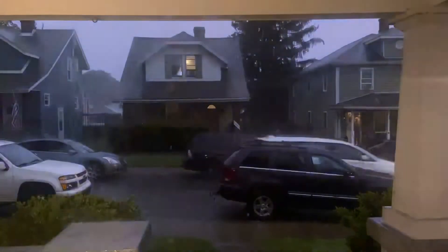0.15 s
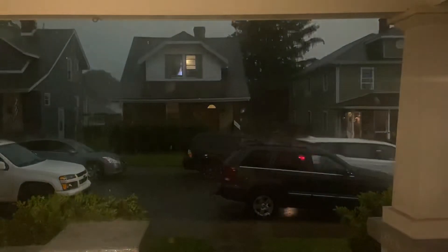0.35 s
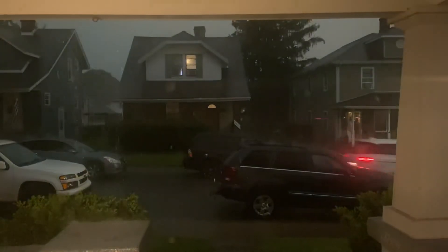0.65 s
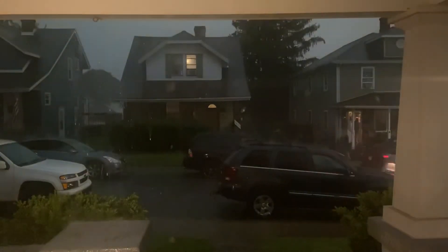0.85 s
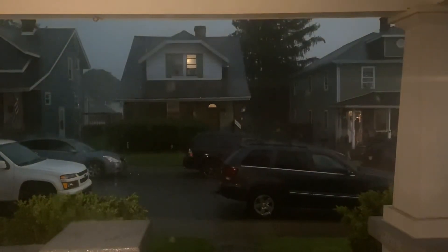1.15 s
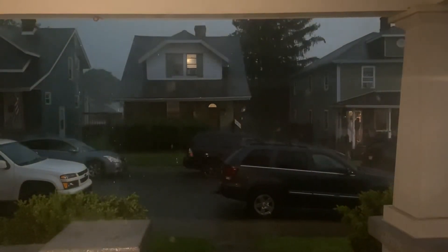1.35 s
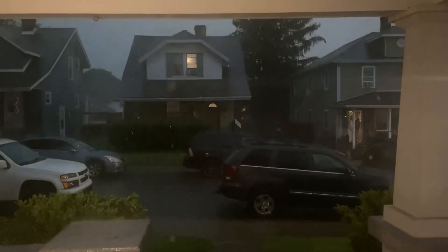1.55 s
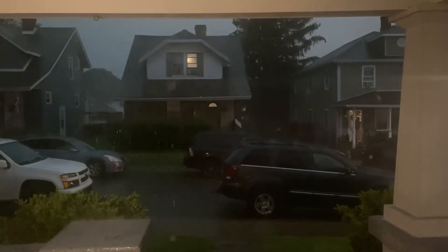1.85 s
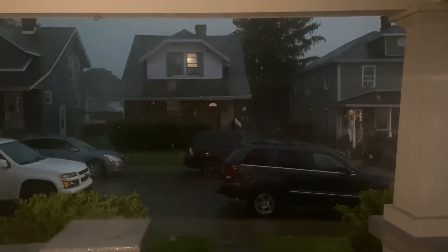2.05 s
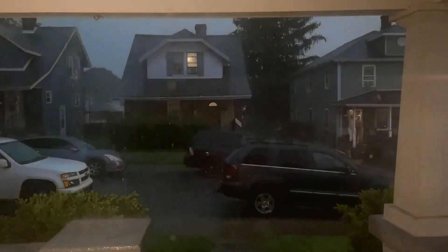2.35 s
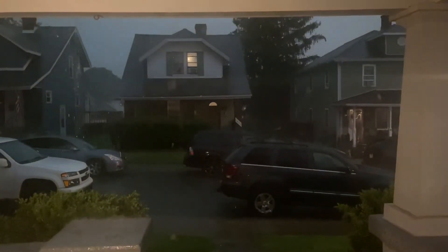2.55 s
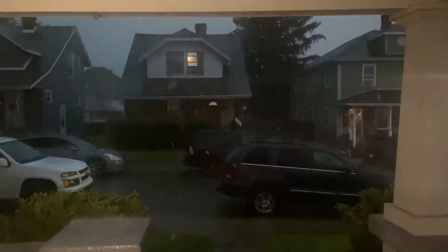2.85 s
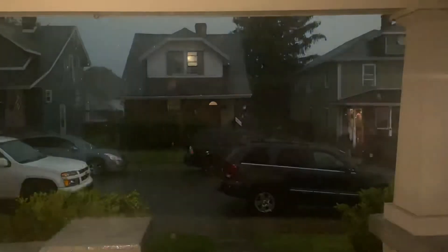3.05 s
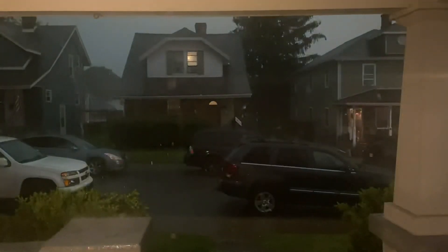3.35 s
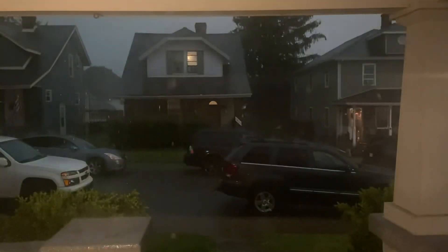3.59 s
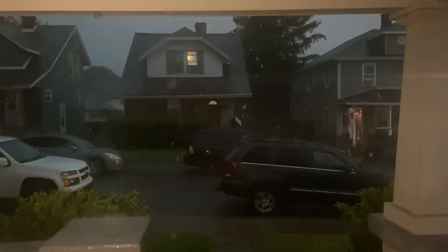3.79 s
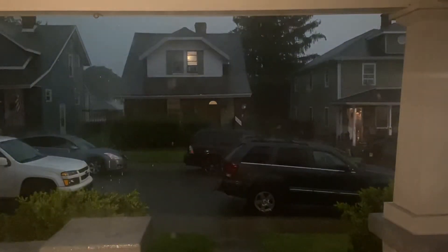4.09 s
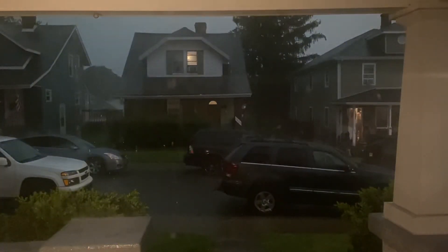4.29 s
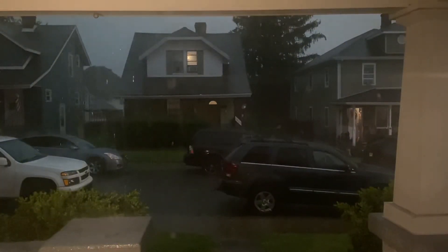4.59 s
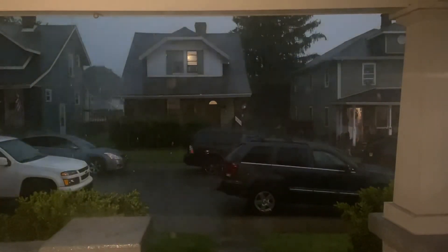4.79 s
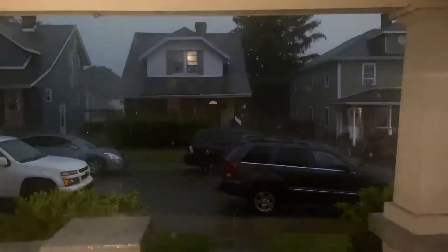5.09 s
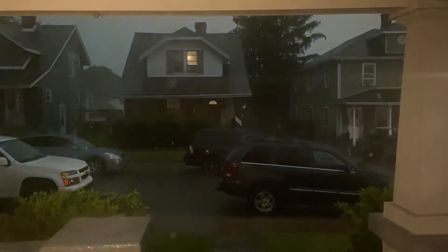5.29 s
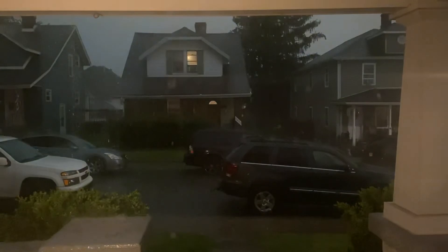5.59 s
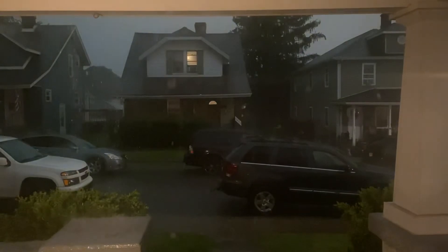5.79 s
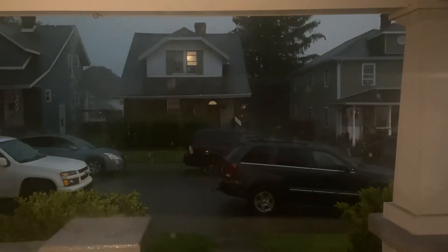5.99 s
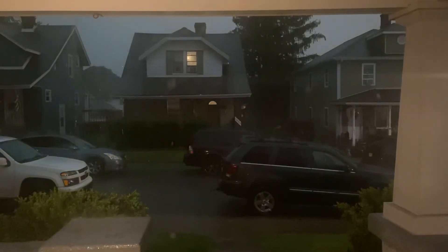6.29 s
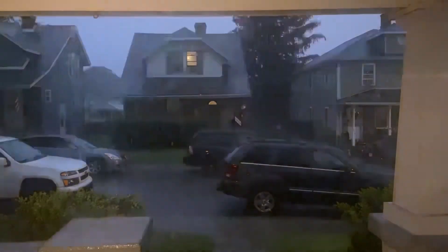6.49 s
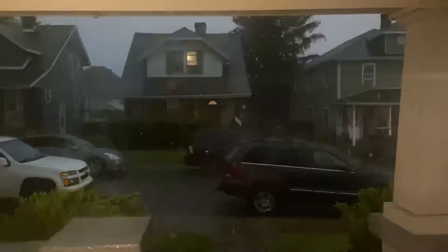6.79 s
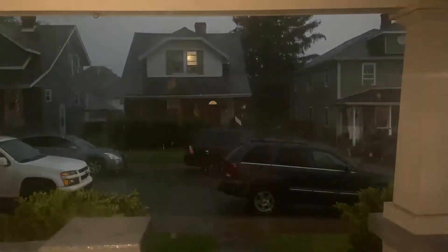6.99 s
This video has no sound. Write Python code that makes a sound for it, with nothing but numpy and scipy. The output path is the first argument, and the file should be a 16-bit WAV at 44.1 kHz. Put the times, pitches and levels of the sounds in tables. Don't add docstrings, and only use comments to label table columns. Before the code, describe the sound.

Heavy rain drums and hisses on a residential street while a long low peal of distant thunder swells, rumbles on and dies away.

```python
import sys
import numpy as np
from scipy import signal
from scipy.fft import rfft, irfft, next_fast_len
from scipy.io import wavfile
from scipy.ndimage import uniform_filter1d

SR = 44100
rng = np.random.default_rng(int(sys.argv[2]) if len(sys.argv) > 2 else 0)


def master_out(mix):
    frames = np.transpose(np.atleast_2d(mix))
    ceiling = np.clip(frames, -1, 1)
    pcm = np.round(ceiling * 32767).astype(np.int16)
    wavfile.write(sys.argv[1], SR, pcm)


def gain_from_db(level_db):
    decades = np.asarray(level_db, float) / 20
    return 10 ** decades


N = 314918
TIME = np.arange(N) / SR
SIZE = next_fast_len(N + SR)
HZ = np.maximum(np.arange(SIZE // 2 + 1) * SR / SIZE, 1)

# (t/s, level/dB)
ROLL_STRENGTH = [(0, 3.5), (.3, 1), (0.579, 2), (.68, 5.5), (1.05, 8), (1.4, 3.5), (1.52, -3), (1.65, 4.5),
                 (1.95, 2), (2.2, -3), (2.6, -0.5), (2.85, 3.5), (3.25, 0.5), (3.5, 5), (3.95, -3.5),
                 (5.8, -2), (6.35, -4), (7.14, -7.5)]
# (f/Hz, level/dB)
ROLL_SPECTRUM = [(20, -26.5), (33, -8), (48, 5), (91, 5.5), (119, 2), (144, -0.5), (243, -13.5), (276, -16),
                 (384, -28.5), (550, -53.5), (920, -120)]
# (upper edge f/Hz, level/dB, share of the strength [1])
ROLL_BANDS = [(40, -59, 0.33), (69.5, -50.5, 0.33), (113, -50, 0.34), (143, -51, 1.0), (178, -49, 0.6),
              (232, -50.5, 0.44), (296, -54, 0.1), (397, -59.5, 0.3)]


def thunder():
    pulses = crowd(4000, scatter_db=2.0)
    spectrum = ports(pulses, gain_from_db(shape(ROLL_SPECTRUM)))
    return played(spectrum, ROLL_STRENGTH, ROLL_BANDS, flicker_db=1.96, rate=15, even=0.78)


# (t/s, peak level/dB, f/Hz)
CLAPS = [(0.07, -22.5, 102.6), (0.173, -27.5, 143), (0.297, -26.5, 146), (0.355, -25.5, 127.6),
         (0.403, -28.5, 101.7), (0.622, -24.5, 110.3), (0.79, -19.5, 130), (0.907, -20.5, 131.7),
         (1.014, -21, 132), (1.084, -21, 124.3), (1.26, -27, 160), (1.303, -24.5, 99.4),
         (1.354, -22, 108.3), (1.493, -28.5, 92), (1.631, -22, 120.6), (1.707, -20, 117.8),
         (1.78, -24, 130.2), (1.853, -31, 104.3), (1.957, -23.5, 133.8), (2.046, -27.5, 94.2),
         (2.295, -28, 100.7), (2.445, -30, 113), (2.528, -28, 123), (2.631, -29.5, 101), (2.744, -26, 118),
         (2.879, -26, 106.4), (3.091, -27, 104.6), (3.306, -27.5, 126), (3.549, -23.5, 108.7),
         (3.636, -28, 99.3), (3.702, -30, 101.6), (3.892, -32.5, 85.6), (4.104, -27, 115.7),
         (4.206, -29, 107), (4.347, -31.5, 111), (4.42, -31, 87.6), (4.5, -30.5, 145),
         (4.548, -26.5, 103.4), (4.739, -25.5, 98.2), (4.839, -30, 103.4), (5.116, -28.5, 105.3),
         (5.238, -27.5, 123.5), (5.318, -27, 103.7), (5.627, -28.5, 107.6), (5.715, -31, 129.6),
         (5.769, -29, 109), (6.024, -32.5, 108), (6.199, -30, 123), (6.416, -29, 131), (6.475, -30.5, 125),
         (6.641, -29, 99), (6.718, -29, 115.7), (6.789, -29, 100.6), (6.835, -36, 108),
         (7.007, -28.5, 92.3),
         (0.639, -27, 98.7), (0.664, -23.5, 119), (0.709, -24.5, 110.2), (0.735, -21, 131.7),
          (0.759, -26, 143), (0.824, -23.5, 98.5), (0.849, -25.5, 124), (0.939, -23, 106),
          (0.979, -24, 131.7), (1.134, -22, 125.2), (1.154, -21, 140.8), (1.194, -25, 135.5),
          (1.224, -30.5, 174.5), (1.389, -22.5, 146.6), (3.419, -28, 94.2), (3.479, -28, 133.3),
          (3.989, -34.5, 83), (6.269, -28, 88), (6.309, -28.5, 153), (6.339, -30.5, 110),
          (6.369, -29.5, 100), (6.948, -29.5, 110.2), (7.079, -31, 89.2)]
# (t/s, peak level/dB, f/Hz)
THUDS = [(0.18, -29.5, 184), (0.303, -33.5, 216), (0.494, -36, 205), (0.755, -33, 172), (1.005, -29.5, 218),
         (1.053, -33, 177), (1.836, -35.5, 187), (1.99, -34, 173), (2.127, -35, 172), (2.526, -34, 172),
         (2.66, -35, 215), (2.795, -35.5, 197), (2.985, -34, 209), (3.323, -33, 269), (3.363, -33.5, 228),
         (3.432, -34, 188), (3.548, -31.5, 188), (4.428, -37, 193), (5.068, -37, 196), (5.254, -34, 173),
         (5.563, -39, 195), (5.737, -37, 186), (5.861, -34.5, 191), (6.229, -38.5, 180), (6.465, -35, 202)]
# (t/s, peak level/dB, f/Hz)
BOOMS = [(0.021, -33, 51), (0.192, -34.5, 48), (0.822, -38, 32.3), (0.825, -30, 69.5), (0.987, -32, 72.7),
         (1.481, -37, 73), (2.214, -39, 61.9), (2.548, -40, 51.1), (2.76, -30, 61.9), (3.369, -38, 72.7),
         (3.845, -38, 43.1), (4.273, -39, 72.7), (4.403, -41.5, 72.7), (4.906, -37, 67.3),
         (5.25, -42, 72.7), (5.882, -38, 72.7), (6.074, -41, 72.7), (6.217, -36, 64.4), (6.436, -35, 53.8),
         (6.623, -52, 32.3), (6.623, -38, 64.6), (6.749, -38, 53.4)]


def claps():
    clap_t60_s, thud_t60_s, boom_t60_s = 0.17, 0.12, 0.38
    clap_rise_s, boom_rise_s = 0.0096, 0.025
    clap_trim_db, thud_trim_db = 2.5, -3
    rows = [(s, db + clap_trim_db, hz, clap_t60_s, clap_rise_s) for s, db, hz in CLAPS]
    rows += [(s, db + thud_trim_db, hz, thud_t60_s, clap_rise_s) for s, db, hz in THUDS]
    rows += [(s, db, hz, boom_t60_s, boom_rise_s) for s, db, hz in BOOMS]
    return rings(rows)


# (t/s, peak level/dB, f/Hz)
DRIPS = [(0.284, -37, 2700), (.307, -40, 2800), (0.554, -39, 2600), (0.5913, -34.5, 3040),
         (1.216, -37, 3100), (1.245, -35.5, 2070), (1.391, -40.5, 2220), (1.912, -37, 2070),
         (2.2723, -43.5, 2940), (3.509, -40, 3010), (2.546, -45.5, 2170), (3.235, -41, 2070),
         (3.3941, -45, 2070), (3.49, -33.5, 2120), (4.0374, -42, 2950), (4.51, -43, 2590),
         (5.105, -43, 3220), (5.516, -40, 3130), (5.65, -41.5, 3170), (6.0888, -47, 3050),
         (6.188, -42, 3600), (6.285, -40.5, 3640), (7.06, -43.5, 2870), (6.6743, -42.5, 2700),
         (6.8684, -40, 3350), (6.9233, -40, 3030)]
# (t/s, peak level/dB, f/Hz)
SLAPS = [(0.5195, -29, 2780), (0.49, -38, 2380), (.884, -31.5, 2600), (0.885, -35, 3400),
         (2.443, -38.5, 2670), (.5205, -37.5, 5200), (.5205, -38, 8200), (.597, -35.5, 4200),
         (.891, -33.5, 2800), (.897, -36, 3400), (2.896, -38, 2730), (1.394, -37.5, 2700),
         (6.728, -40, 2870), (7.13, -37.5, 3500), (2.0, -39, 2150)]
# (t/s, peak level/dB, f/Hz)
PLINKS = [(3.478, -36, 2990), (3.5, -39, 2900), (3.525, -46, 2690), (1.85, -42, 2860), (2.12, -45, 2900),
          (2.37, -47, 2800), (2.69, -40, 2900), (6.78, -42.5, 2910), (6.97, -44, 2800),
          (3.636, -40.5, 2720), (3.703, -42.5, 2850), (5.095, -45, 2780), (5.109, -40.5, 2930),
          (5.134, -41, 3120), (5.233, -41.5, 2700), (5.25, -44, 2920), (5.285, -44, 2850),
          (.552, -46, 2750), (.58, -41, 2850), (.64, -46, 2800), (.78, -41.5, 2800), (2.65, -41, 2900),
          (2.27, -44, 3200), (6.43, -43, 2700), (6.52, -45, 2900), (6.94, -43, 2100), (7.05, -45, 2800),
          (4.78, -44, 2750), (4.93, -46, 2900)]
# (t/s, peak level/dB)
TICKS = [
    (0.5198, -37.5),
    (.597, -37.5),
    (2.745, -39),
]
# (t/s, peak level/dB, t60/s)
GLINTS = [
    (0.5198, -22, .04),
    (.597, -37, .05),
    (1.14, -42.5, .3),
    (1.19, -41.5, .3),
    (1.235, -45, .2),
    (2.745, -26, 0.045),
]


def drips():
    drip_rise_s, tick_rise_s = 0.004, 0.001
    # t60/s, rise/s, half width/octaves
    rows = [(*row, 0.18, drip_rise_s, 0.37) for row in DRIPS]
    rows += [(*row, 0.036, 0.00079, 0.35) for row in SLAPS]
    rows += [(*row, 0.087, drip_rise_s, 0.14) for row in PLINKS]
    rows += [(s, db, 10500, 0.086, tick_rise_s, 0.97) for s, db in TICKS]
    rows += [(s, db, 14500, t60, tick_rise_s, 0.09) for s, db, t60 in GLINTS]
    return splashed(rows)


# (t/s, peak level/dB, t60/s)
SPRAY = [(.86, -44, .6), (6.42, -48, .3), (6.6, -48, .3), (1.201, -37, 0.48), (2.271, -44.5, 0.38),
         (2.641, -49.5, .5), (3.47, -39, .36), (6.7, -45, .6), (1.75, -47, .6), (4.501, -45, .18),
         (5.1, -50.5, 0.33), (5.521, -43, 0.056), (5.646, -40.5, 0.44)]
# (t/s, peak level/dB, t60/s)
MIST = [
    (.87, -39.5, 0.36),
    (1.129, -40, 0.73),
    (1.921, -46, 0.24),
    (2.201, -48, 0.84),
    (4.77, -50.5, .5),
    (5.311, -42.5, 0.22),
]


def spray():
    rows = [(s, db, 4700, t60, 0.017, 0.42) for s, db, t60 in SPRAY]
    rows += [(s, db, 11000, t60, 0.086 * t60, 0.22) for s, db, t60 in MIST]
    return splashed(rows)


# (t/s, peak level/dB, f/Hz, t60/s, half width/octaves)
SPILLS = [(.594, -32, 1310, 0.14, 0.87), (1.213, -34.5, 930, 0.15, 0.15), (1.236, -35, 520, 0.11, 0.37),
          (1.279, -35, 850, 0.09, .32), (1.912, -39, 1610, 0.15, 0.56), (3.245, -38, 1250, 0.26, 0.95),
          (3.484, -31.5, 1000, 0.25, .45), (3.505, -31.5, 800, 0.52, 0.98), (3.538, -37, 588, .35, 0.7),
          (3.662, -43, 700, 0.18, 0.6), (5.12, -38.5, 1430, 0.15, .44), (6.29, -38, 480, 0.58, 0.66),
          (6.338, -35.5, 1050, 0.19, 0.6), (6.345, -34, 1900, .12, 0.54), (6.51, -38.5, 800, 0.29, .7)]
# (f/Hz, width/Hz, level/dB)
BOARD_MODES = [(431, 96, 2.5), (680, 37, 1), (772, 10, 1.5), (980, 60, -4), (1051, 37, -5),
               (1236, 68, -7.5), (1510, 13, -22)]


def spills():
    rows = [(s, db, hz, t60, 0.04 * t60, octaves) for s, db, hz, t60, octaves in SPILLS]
    boards = 0
    for k, (hz, width, db) in enumerate(BOARD_MODES):
        boards = boards + (-1) ** k * gain_from_db(db) * resonance(hz, width)
    slosh = gain_from_db(-14.0) * resonance(550, 2300)
    return irfft(ports(bursts(rows), gain_from_db(7.5) * (boards + slosh)), SIZE)[:, :N]


# (t/s, peak level/dB, f/Hz, t60/s)
KNOCKS = [(1.213, -41, 925, 0.11), (1.23, -40, 960, 0.13), (1.247, -47, 947, 0.072), (1.234, -47, 775, .1),
          (1.241, -45.5, 2090, 0.098), (1.1, -48, 960, 0.073), (3.486, -48, 2090, 0.11),
          (3.487, -40.5, 1077, 0.16), (3.509, -44, 1096, .2), (3.55, -48, 1155, .12),
          (3.49, -47, 1290, 0.17), (3.505, -40.5, 681, .2), (3.52, -40, 695, .18), (3.548, -38.5, 685, .2),
          (3.585, -42, 705, 0.12), (3.495, -45, 472, .12), (3.524, -36.5, 431, 0.22),
          (3.553, -38.5, 424, 0.3), (3.663, -46, 437, .15), (6.34, -50, 1088, 0.11),
          (6.355, -50.5, 877, 0.11), (6.345, -47, 478, 0.18), (6.36, -50.5, 612, 0.13),
          (6.515, -52, 1310, 0.1), (6.515, -51, 540, .1), (6.94, -49, 533, 0.1),
          (.5205, -39.5, 2780, 0.046), (.526, -44, 2300, 0.06), (.521, -46.5, 3270, 0.065),
          (0.65, -47, 2690, .05), (.603, -48, 2205, .06), (3.486, -42.5, 900, .07), (3.492, -45, 750, .12),
          (3.505, -47, 1260, .15), (3.518, -44, 1160, .1), (3.548, -47, 1050, 0.11), (3.57, -48, 1200, .1),
          (3.515, -49.5, 2110, .12), (2.9, -44.5, 440, .12), (3.69, -46, 610, .1), (3.63, -48.5, 660, .1),
          (.598, -51.5, 3900, .04), (.614, -46, 940, .05), (.603, -48, 950, .05), (.531, -50, 3500, .05),
          (1.32, -50, 960, .1), (3.53, -38, 325, .25), (6.28, -42.5, 335, 0.37), (.885, -47, 2700, .05)]


def knocks():
    return rings([(*row, 0.041 * row[-1]) for row in KNOCKS])


# (t/s, level/dB)
PIPE_STRENGTH = [
    (0, -14),
    (6.2, -10.5),
    (6.55, 1.5),
    (7.14, -1),
]


def downpipe():
    water = rng.standard_normal((2, N))
    spectrum = ports(water, resonance(532.5, 11) ** 2)
    return played(spectrum, PIPE_STRENGTH, [(SR, -65, 1)], flicker_db=1.0, rate=12, even=.9)


# (t/s, level/dB)
RAIN_STRENGTH = [(0, -1), (.5, -0.5), (1.5, -1), (2.8, -0.5), (3.6, -0.5), (3.95, -2), (5.9, -3),
                 (6.401, -3), (6.62, -2.5), (6.76, -4), (6.9, -2.5), (7.14, -3)]
# (f/Hz, level/dB)
RAIN_SPECTRUM = [(200, -7.5), (380, 8.5), (860, -6), (1300, -10), (1560, -14.5), (1950, -16), (2780, -16),
                 (3900, -19.5), (5600, -27), (6850, -26.5), (8000, -35.5), (10000, -44), (12200, -48),
                 (13500, -64), (16000, -64.5)]
# (upper edge f/Hz, level/dB, share of the strength [1])
RAIN_BANDS = [
    (627, -55.5, 1.1),
    (1000, -62.5, 1.5),
    (1600, -62, 1.3),
    (2310, -65, 4.1),
    (3840, -61, 0.89),
    (12400, -66.5, 0.59),
]


def rain():
    drops = rng.standard_normal((2, N)) + gain_from_db(-7.0) * crowd(1500, scatter_db=2.0)
    spectrum = ports(drops, gain_from_db(shape(RAIN_SPECTRUM)))
    return gain_from_db(-1.86) * played(spectrum, RAIN_STRENGTH, RAIN_BANDS, flicker_db=1.4, rate=24, even=.4)


def splashed(rows):
    street = gain_from_db(shape(RAIN_SPECTRUM) + 15.0) * HZ / (HZ + 2500)
    return irfft(ports(bursts(rows), street), SIZE)[:, :N]


def bursts(rows):
    out, droplets = np.zeros((2, N)), crowd(15000, scatter_db=1.3)
    for s, db, hz, t60, rise, octaves in rows:
        start, envelope = swell(s, db, t60, rise)
        part = slice(start, start + len(envelope))
        edges = hz * 2 ** (np.clip(octaves, .05, .8) * np.array([-1, 1]))
        band = signal.butter(2, edges, "band", fs=SR, output="sos")
        burst = signal.sosfilt(band, droplets[:, part] * envelope)
        out[:, part] += burst * np.sqrt(hz / np.ptp(edges))
    return out


def rings(rows):
    out, phases = np.zeros((2, N)), 2 * np.pi * rng.random(len(rows))
    for (s, db, hz, t60, rise), phase in zip(rows, phases):
        start, envelope = swell(s, db, t60, rise)
        tone = np.sin(2 * np.pi * hz * TIME[:len(envelope)] + phase)
        out[0, start:start + len(envelope)] += envelope * tone
    return irfft(ports(out, 1 / porch()), SIZE)[:, :N]


def swell(s, db, t60, rise):
    t = np.arange(int(SR * np.clip(t60, .02, .5))) / SR
    start = int(s * SR)
    decay = gain_from_db(db - 60 * t / max(t60, .01))
    envelope = decay * (1 - np.exp(-(t / max(rise, .0003)) ** 2))
    return start, envelope[:N - start]


def crowd(rate, scatter_db):
    hit = rng.random((2, N)) < rate / SR
    size = rng.exponential(size=(2, N))
    sign = rng.standard_normal((2, N))
    clicks = hit * gain_from_db(scatter_db * np.minimum(size, 2.5)) * sign
    return clicks / np.sqrt(np.mean(clicks ** 2))


def walk(rate):
    k = int(SR / rate)
    steps = np.repeat(rng.standard_normal(N // k + 1), k)
    return 1.3 * uniform_filter1d(uniform_filter1d(steps, k), k)[:N]


def played(spectrum, strength, bands, flicker_db, rate, even=0.):
    out, below = 0, 0
    swing_db = np.interp(TIME, *np.transpose(strength))
    for edge_hz, band_db, share in bands:
        under = 1 / (1 + (HZ / edge_hz) ** 8)
        band = irfft(spectrum * np.sqrt(np.maximum(under - below, 0)), SIZE)[:, :N]
        power = uniform_filter1d(uniform_filter1d(band.mean(axis=0) ** 2, size=6000), size=6000)
        band = band / power ** (even / 2)
        db = band_db + share * swing_db + flicker_db * walk(rate)
        out = out + band * gain_from_db(db) / np.std(band.mean(axis=0))
        below = under
    return out


def shape(table):
    hz, db = np.transpose(table)
    return np.interp(np.log(HZ), np.log(hz), db)


def resonance(hz, width):
    return 1j * HZ * width / (hz ** 2 - HZ ** 2 + 1j * HZ * width)


# (f/Hz, width/Hz, lift level/dB)
PORCH_MODES = [(103, 12, 4.5), (137.2, 4.7, 3.5), (161, 11, -1), (273.5, 14, 6), (426, 2.6, 4),
               (682, 13, -5.5), (1297, 110, 6.5), (2120, 130, 6), (2820, 600, 6.5), (11864, 25, 9),
               (12134, 20, 9.5)]


def porch():
    return gain_from_db(sum(db * abs(resonance(hz, width)) ** 2 for hz, width, db in PORCH_MODES))


# (f/Hz, level/dB)
APART = [(80, -16.5), (150, -17.5), (260, -8), (370, -6.5), (1000, -2.5), (1550, -2.5), (2050, -3),
         (2330, -10), (2900, -6), (3600, -6), (4500, -9.5), (6100, -6), (8800, 2.5), (10500, 1)]
# (f/Hz, level/dB)
LEFT_LEAN = [(60, -.4), (100, 0), (180, 1), (300, 2), (510, .3), (880, 1), (1500, 5), (2570, 5), (4390, 5),
             (7510, 1)]
# (f/Hz, phase/rad)
LEFT_LEAD = [(200, 0), (690, -.4), (1250, -.3), (1550, 2.0), (2070, .6), (2330, .2), (3270, .8), (3790, 0),
             (4480, .7), (5770, -.4), (6200, 0)]


def ports(pair, gain):
    mid, other = rfft(pair, SIZE) * gain
    mid = mid * porch()
    lean = gain_from_db(shape(LEFT_LEAN)) * np.exp(1j * shape(LEFT_LEAD))
    side = mid * (lean - 1) / (lean + 1) + other * gain_from_db(shape(APART))
    return np.array([mid + side, mid - side])


def scene():
    return thunder() + claps() + drips() + spray() + spills() + knocks() + downpipe() + rain()


def band_limit(x):
    return signal.sosfilt(signal.butter(12, 16000, fs=SR, output="sos"), x)


# (from f/Hz, to f/Hz, level/dB)
MID_GAPS = [(8200, 8850, -5.5), (8800, 9650, -19), (12250, 13600, -17)]
# (from f/Hz, to f/Hz, level/dB)
SIDE_GAPS = [(6250, 7550, -19), (10300, 12000, -19), (14800, 23000, -19)]


def record(dry):
    soft = .16 * np.tanh(dry / .16)
    mid, side = rfft([soft[0] + soft[1], soft[0] - soft[1]], SIZE) / 2
    for part, gaps in ((mid, MID_GAPS), (side, SIDE_GAPS)):
        for low, high, db in gaps:
            part[(HZ > low) & (HZ < high)] *= gain_from_db(db)
    mix = irfft([mid + side, mid - side], SIZE)[:, :N]
    return band_limit(mix)


dry = scene()
out = record(dry)
master_out(out)
```